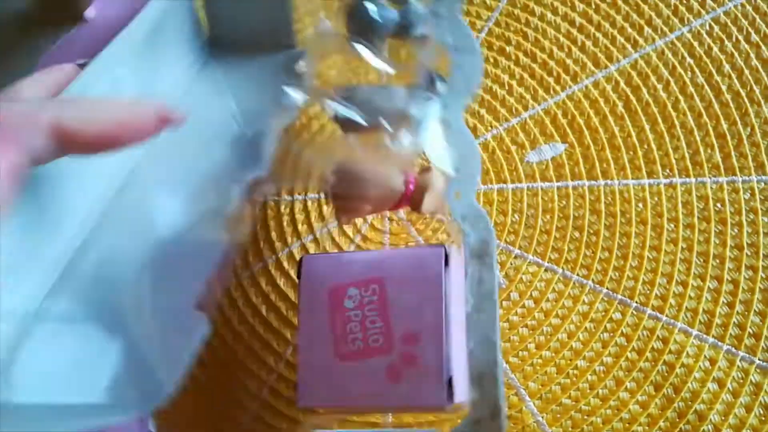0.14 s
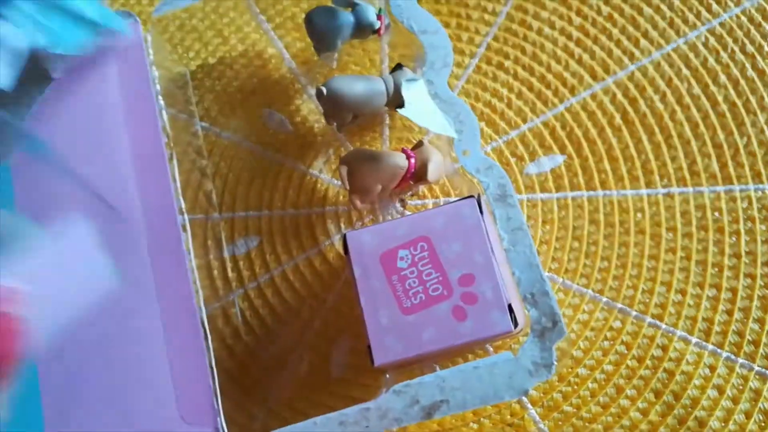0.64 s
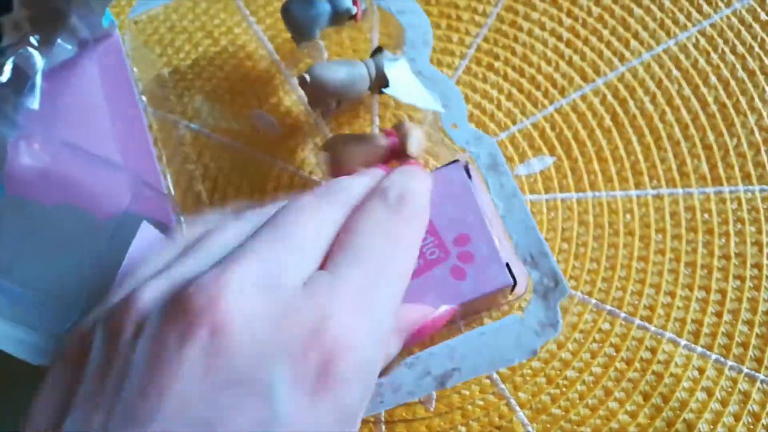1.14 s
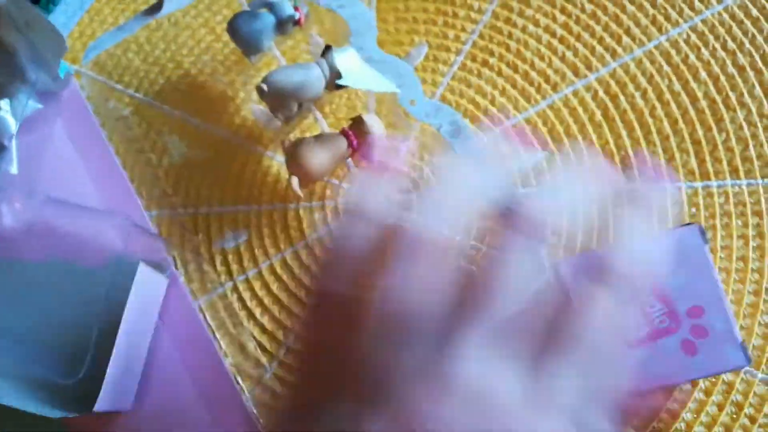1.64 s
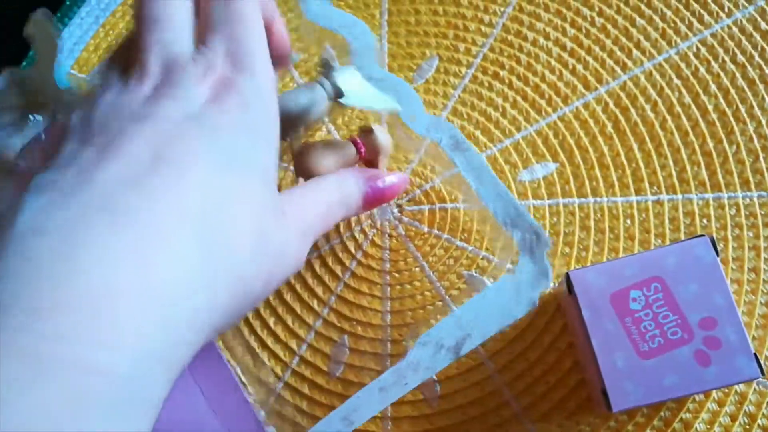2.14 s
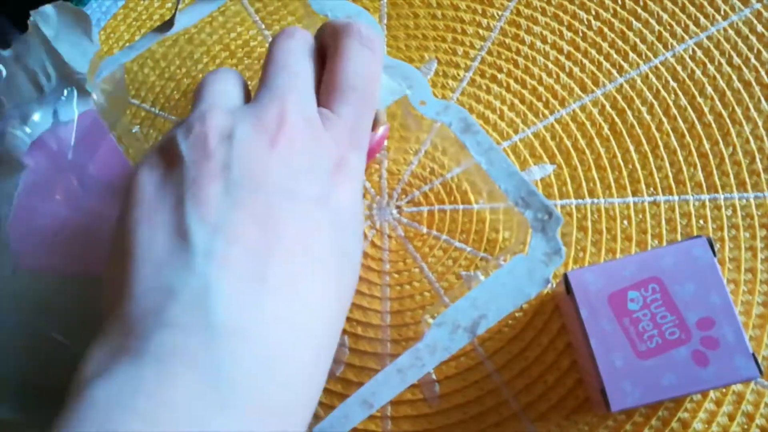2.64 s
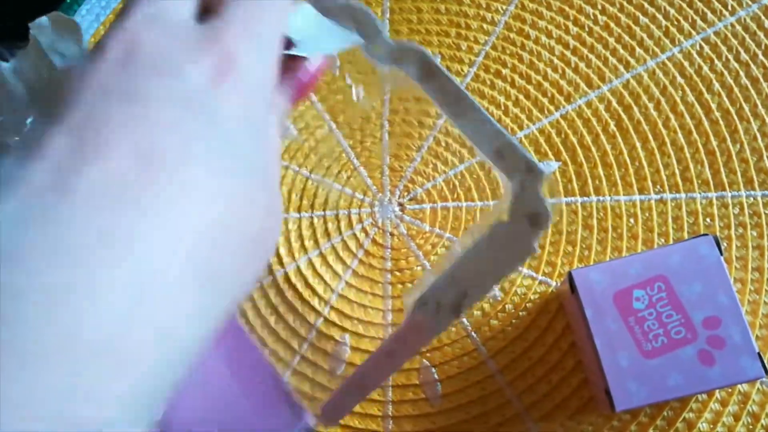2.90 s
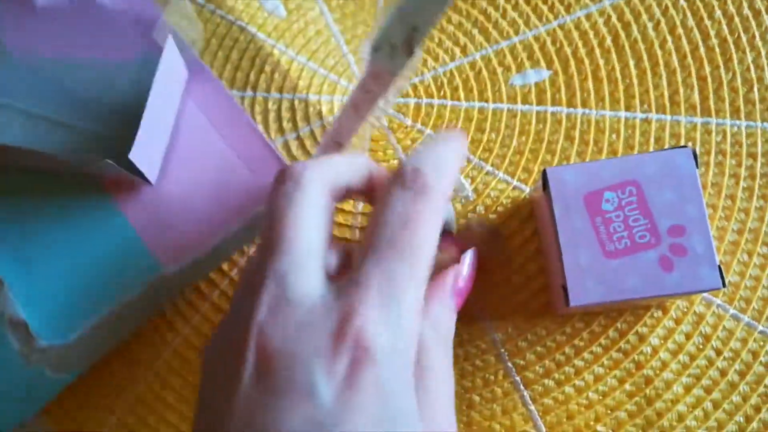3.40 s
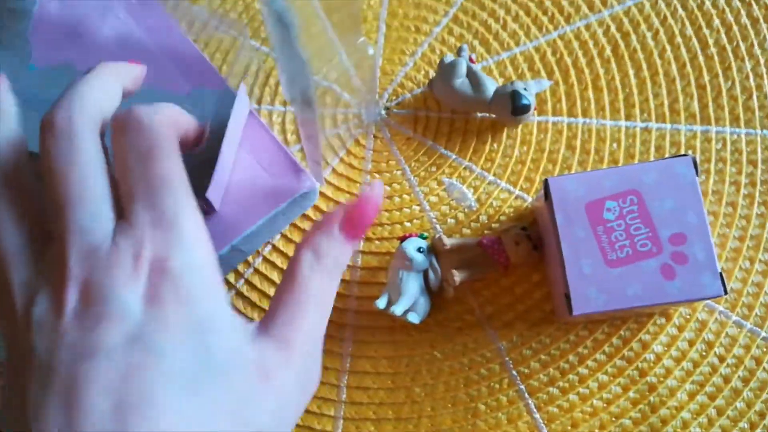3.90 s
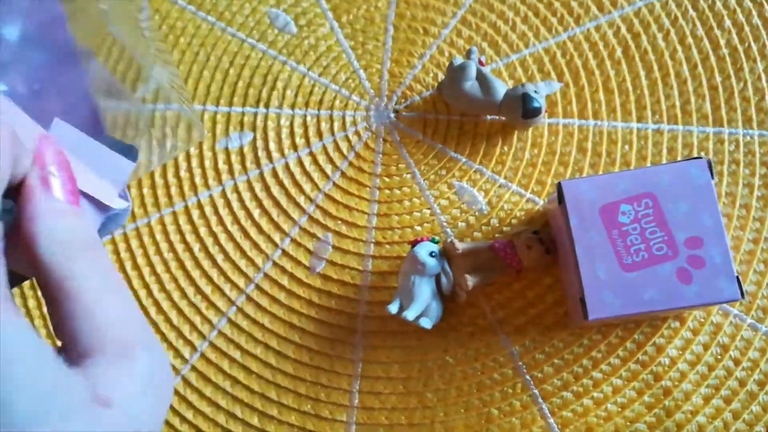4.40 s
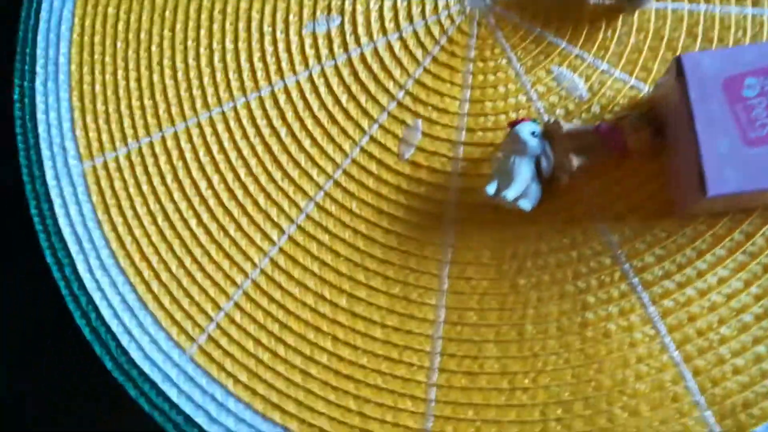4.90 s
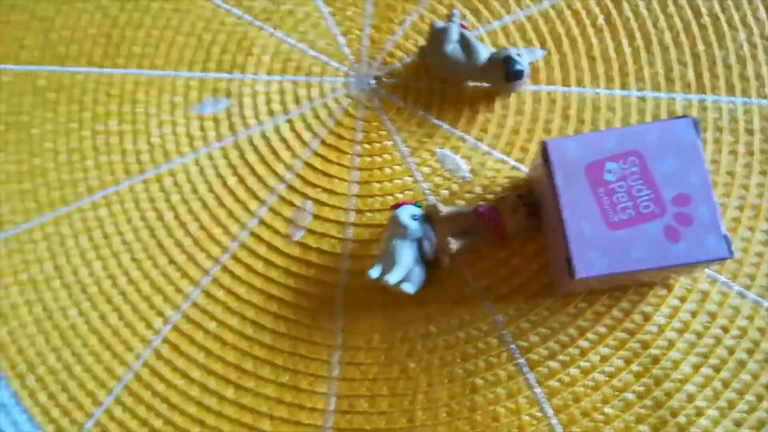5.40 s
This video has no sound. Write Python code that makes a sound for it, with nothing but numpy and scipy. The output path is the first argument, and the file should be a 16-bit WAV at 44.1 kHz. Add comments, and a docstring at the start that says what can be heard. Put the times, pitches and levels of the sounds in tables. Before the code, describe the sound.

Hands crinkle and tear a stiff clear blister pack over a table, busy bursts first, then isolated clicks, knocks and faint scrapes.

```python
"""Crisp plastic film crackles and thumps at once, close to a pair of microphones above a table: hands tear,
bend and crinkle a blister pack on cardboard. The film is noise under a dense rustle, sharp snaps that ring
and stick-slip creaks. Below it, noise and struck modes make the card and table scrape and thud.
Short reflections answer from the room, and behind them lie a quiet room tone and a faint hum."""
import sys
import numpy as np
from scipy import signal
from scipy.fft import rfft, irfft, next_fast_len
from scipy.io import wavfile
from scipy.ndimage import uniform_filter1d

SR = 44100
rng = np.random.default_rng(int(sys.argv[2]) if len(sys.argv) > 2 else 0)


def undo_db(level):
    """Turn decibels back into plain size, where 20 dB means ten times bigger."""
    steps = np.asarray(level, float) / 20
    return 10 ** steps


def pcm_store(signal):
    """Save signal as 16-bit PCM."""
    levels = np.round(np.clip(np.atleast_2d(signal), -1, 1) * 32767)
    wavfile.write(sys.argv[1], SR, levels.astype(np.int16).T)


N = 244314  # samples

# Hands crumple and tear the film. Each row: peak in seconds, rise in seconds, fall in seconds,
# rustle level in dB, treble in dB above the rustle.
CRUMPLES = [(0.0, .05, 0.04, -45, 2.5), (0.054, 0.024, 0.081, -39, -3), (.085, 0.04, 0.067, -35, -3),
            (.14, 0.052, 0.043, -39.5, -7.5), (.24, 0.1, 0.028, -60.5, 6), (.272, 0.022, 0.021, -45.5, 5.5),
            (.335, .025, 0.05, -53, 2.5), (.369, 0.068, 0.043, -45, -11), (.396, 0.024, 0.016, -33, -3),
            (.453, .06, 0.021, -50, -10.5), (0.549, 0.013, 0.045, -47, 6.5), (.695, 0.034, 0.12, -58, -3),
            (.757, 0.044, 0.032, -44.5, -3), (.954, 0.043, 0.056, -61, 0), (1.12, 0.42, 0.036, -65, -7),
            (1.159, 0.022, 0.15, -44, -12.5), (1.291, 0.049, 0.052, -44, -1), (1.34, .05, 0.038, -54, -5),
            (1.598, .008, 0.045, -55, -3), (1.85, 0.034, .08, -57.5, -1), (1.889, .03, 0.022, -50, -6),
            (1.939, 0.022, 0.042, -48.5, -8), (1.99, 0.016, .04, -45.5, -9),
            (2.011, 0.032, 0.035, -37.5, -13), (2.139, 0.036, .08, -60, -2),
            (2.171, 0.011, 0.053, -38, -5.5), (2.26, 0.16, .1, -60, -3), (2.317, 0.028, 0.081, -46, -15),
            (2.355, 0.045, 0.06, -51, -2.5), (2.448, 0.013, 0.026, -45, -15),
            (2.561, 0.0078, 0.074, -46.5, -4), (2.588, 0.035, 0.043, -37, -16),
            (2.625, 0.048, 0.1, -51, -4.5), (2.997, 0.034, 0.024, -56, 12.5), (3.316, 0.08, 0.13, -72, -10),
            (3.465, .1, 0.1, -60, -4), (3.755, 0.011, 0.17, -53.5, -7), (3.828, 0.066, 0.034, -55, 4),
            (3.882, 0.022, 0.045, -62.5, 9), (4.122, 0.081, 0.05, -49.5, 6.5), (4.2, 0.17, 0.12, -55.5, 5),
            (4.282, 0.03, 0.054, -50.5, -5), (4.377, 0.12, .15, -69, -14),
            (4.617, 0.071, 0.043, -48.5, 4.5), (4.632, 0.039, 0.078, -51.5, -3),
            (5.117, .022, 0.041, -57.5, -5), (5.151, .02, 0.083, -41.5, 0.5),
            (5.251, 0.044, 0.031, -57.5, -0.5)]
# Faint rustle between the movements. Each row: time in seconds, level in dB.
FIDGET = [(0.0, -75), (.6, -76), (.9, -86), (1.5, -80.5), (1.82, -74.5), (2.75, -73.5), (2.92, -71.5),
          (3.05, -84), (4.0, -73.5), (5.54, -80.5)]
FIDGET_TREBLE_DB = -3  # relative to the faint rustle
# Buckling film. Each row: start in seconds, level in dB, time held before it settles in ms,
# ring in Hz, treble in dB above the level.
SNAPS = [(0.0205, -40.5, 2.8, 2240, -2), (0.032, -42, 1.1, 3120, 8), (0.038, -40, 1.1, 5100, -3.5),
         (0.0477, -36, 2.3, 7300, 8.5), (0.0714, -41, 11, 2180, 0), (0.0817, -25.5, 2.1, 2550, -10),
         (0.09, -29.5, 3.8, 1800, -9), (0.218, -50, 1, 8900, 9), (0.225, -47, 0.89, 10380, 13.5),
         (0.259, -45, 9.5, 4570, 10.5), (0.2861, -40.5, 1.6, 4520, 10), (0.3398, -31.5, 1, 9110, 11),
         (0.3437, -37.5, 5.3, 4400, -4), (0.3724, -23, 0.75, 2210, 0.5), (0.3865, -41.5, 5.7, 2030, 9.5),
         (0.4028, -20.5, 0.85, 3720, -4), (0.444, -38.5, 4.7, 4440, -9), (0.458, -35.5, 0.93, 3640, -4),
         (0.484, -43.5, 3.3, 3620, 7), (0.516, -53.5, 2, 9840, 19), (0.536, -53, 1.5, 9240, 19),
         (0.544, -43, 3.6, 8400, 20.5), (0.5592, -47, 1.5, 8800, 13), (0.677, -44.5, 1.8, 3800, -17),
         (0.693, -53, 5.5, 1590, -8), (0.7305, -40, 1.4, 4400, -3), (0.7555, -40.5, 4.3, 2430, 1.5),
         (0.7584, -34, 2.3, 3960, -11), (0.8, -52.5, 1.8, 8530, 4), (0.814, -57.5, 4.6, 4220, -12),
         (0.8856, -70, 2.2, 4670, 14), (1.0258, -48, 1.7, 2640, -10), (1.0423, -55, 1.6, 3470, 0),
         (1.07, -45, 1.5, 5600, -15), (1.1025, -49, 1.8, 1950, -4), (1.1462, -34.5, 2.7, 2400, -9),
         (1.169, -42.5, 2.6, 2510, -8), (1.1948, -49, 7.6, 2570, -8), (1.2113, -38, 6, 2610, -12),
         (1.2505, -28, 2.85, 1550, -8.5), (1.2575, -39.5, 5.4, 1730, -20), (1.2867, -37.5, 5.4, 3750, -1.5),
         (1.346, -52.5, 3.8, 2190, -9), (1.3644, -61, 5.5, 2180, -16), (1.586, -39.5, 2.4, 5070, -7),
         (1.643, -60.5, 1.6, 3770, 7), (1.8398, -40.5, 2.3, 4060, -3.5), (1.8834, -44, 2.4, 2300, -5),
         (1.8903, -44.5, 4.2, 2390, -5), (1.9364, -46.5, 4.5, 8800, -2), (1.9427, -42.5, 1.7, 6800, 8),
         (1.9872, -32, 1.74, 2450, -2), (2.007, -40, 1.5, 5100, 5), (2.0138, -31.5, 1, 4070, -3),
         (2.1121, -52, 1.4, 5140, 4), (2.1296, -45.5, 6.5, 3660, -13), (2.1633, -25.5, 3.7, 2020, -2.5),
         (2.1695, -37.5, 5, 5100, -1), (2.2347, -46, 1.6, 2170, -9), (2.246, -45, 1.9, 3530, 2.5),
         (2.2907, -53, 2.7, 4260, -8.5), (2.3101, -36.5, 2.5, 2260, -3.5), (2.329, -40, 4.3, 2430, -7),
         (2.3363, -44.5, 6.5, 5070, 4), (2.3478, -39.5, 2, 2110, 5), (2.359, -37.5, 1.5, 3600, -3),
         (2.3807, -39.5, 2.8, 2340, -8), (2.393, -44, 1.8, 1760, -1), (2.447, -48, 3.2, 5500, 7),
         (2.4862, -43, 1, 3650, -18), (2.5482, -41.5, 2.9, 3400, -4), (2.5592, -31, 1.2, 1470, -12),
         (2.578, -32.5, 1.6, 3750, 1.5), (2.583, -44, 3.2, 4800, 8.5), (2.6445, -25.5, 1.72, 2820, -15.5),
         (2.6855, -41, 1.2, 2440, -8), (2.7758, -55.5, 5.6, 2380, -3.5), (2.8064, -54.5, 3.2, 5260, -4),
         (2.858, -55.5, 3.8, 2070, -30), (2.916, -52, 1.1, 3290, -14), (2.9534, -62, 36, 2150, -19),
         (3.3, -69, 26, 2150, -20), (3.4231, -48.5, 3.3, 1360, -7.5), (3.534, -52, 2.1, 2140, 0.5),
         (3.743, -44, 3.5, 6700, 6), (3.8649, -58, 4.6, 2220, -6), (3.7823, -34.5, 2.5, 2480, -24),
         (3.819, -45.5, 1.4, 5340, 8), (4.0478, -51, 3.4, 5150, 11), (4.073, -43, 1.2, 5360, 5),
         (4.2701, -33.5, 2.85, 2100, -9.5), (4.3637, -59, 3.7, 2130, -1), (4.3828, -55, 1.8, 9580, 1),
         (4.6434, -30.5, 3.43, 2800, -2), (4.778, -64, 1.16, 10900, 14), (4.836, -64, 0.73, 9300, 17),
         (5.105, -55.5, 6.6, 3020, 1), (5.112, -56, 7.5, 3050, -14), (5.1363, -44, 9.1, 5000, 4),
         (5.1918, -42.5, 1.74, 8100, 7.5), (5.236, -52, 6.5, 2050, -17), (5.263, -66, 1.6, 3930, -4)]
# Small snaps come by chance, a little louder than the rustle around them.
TICKS = 45
TICK_DB, TICK_MS = 2, 1.74  # least level above the rustle; mean hold
TICK_LOW_HZ, TICK_HIGH_HZ = 1800, 5800
# Stick-slip of film on card. Each row: start in seconds, end in seconds, slips per second at the start,
# slips per second at the end, level in dB.
CREAKS = [(.11, .15, 1350, 1550, -45), (.15, .177, 1500, 1250, -43), (.317, .328, 1070, 1160, -39)]
# Spectrum that the stiff sheet radiates. Each row: frequency in Hz, level in dB.
FILM_SPECTRUM = [(410, -14.5), (700, -8), (994, -11.5), (1550, -1.5), (1830, -4), (2140, 1.5), (3040, -4),
                 (3740, -2), (7640, -10.5), (8470, -8), (10700, -12), (13300, -10), (15600, -16)]
SPLIT_HZ = 6000  # between the middle and the treble of the film
# Where the hands work. Each row: time in seconds, left over right in dB.
HAND_PLACE = [(0.0, 0), (1.29, -1), (1.46, -1), (4.51, .5), (4.69, 2.5), (4.91, -1.5), (5.54, -3)]

# Card dragged on a mat. Each row: peak in seconds, rise in seconds, fall in seconds,
# card level in dB, table level in dB.
DRAGS = [(.03, 0.16, 0.13, -70, -54.5), (.083, 0.059, 0.068, -47, -53), (.275, 0.076, 0.057, -59, -70),
         (.382, 0.033, 0.047, -44.5, -43), (.49, 0.023, 0.065, -67, -53), (.766, 0.037, 0.032, -52, -52),
         (.96, 0.06, 0.025, -61.5, -65), (1.17, 0.027, 0.14, -72, -63), (1.262, 0.15, .11, -60.5, -62.5),
         (1.594, .017, .04, -65, -59), (1.892, 0.078, 0.051, -67.5, -64.5), (2.014, 0.094, 0.051, -55, -74),
         (2.172, 0.053, 0.077, -52, -72), (2.253, 0.043, 0.073, -60, -65), (2.349, 0.085, 0.096, -53, -64),
         (2.455, 0.033, 0.075, -64, -67), (2.585, 0.055, .11, -52.5, -85),
         (2.985, 0.08, 0.05, -61.5, -62.5), (3.31, 0.027, .1, -71.5, -67),
         (3.432, 0.025, 0.052, -55.5, -54), (3.465, 0.048, 0.15, -60, -55.5), (3.54, .02, 0.072, -66, -55),
         (3.76, 0.016, 0.068, -59, -61), (3.79, 0.02, 0.057, -54, -61), (3.82, 0.036, 0.068, -55.5, -58),
         (3.88, 0.046, 0.045, -62, -57), (4.107, .055, .15, -58.5, -58), (4.376, 0.025, 0.046, -81, -55),
         (4.59, 0.19, 0.045, -71, -77), (4.648, 0.018, 0.049, -44, -77), (5.142, 0.019, .11, -49.5, -56.5)]
REST_CARD_DB, REST_TABLE_DB = -89, -78  # the pack never lies quite still
# Fingers and figures hit the card. Each row: start in seconds, level in dB, panel mode in Hz.
KNOCKS = [(0.036, -49, 485), (0.069, -24.5, 554), (0.268, -45.5, 383), (0.377, -32, 514), (0.445, -53, 605),
          (0.486, -47.5, 574), (0.697, -54, 580), (0.755, -39.5, 398), (0.95, -46, 493),
          (1.148, -48.5, 527), (1.181, -53.5, 557), (1.212, -46.5, 570), (1.252, -61, 540),
          (1.291, -46, 514), (1.588, -54, 547), (1.892, -60, 646), (1.935, -56, 414), (1.983, -50, 687),
          (2.009, -41, 560), (2.132, -44.5, 514), (2.163, -37, 338), (2.246, -48.5, 480), (2.333, -47, 405),
          (2.347, -42.5, 540), (2.449, -44.5, 455), (2.56, -46.5, 368), (2.585, -38, 449),
          (2.645, -46, 508), (2.686, -50, 550), (2.712, -56.5, 565), (2.839, -58, 550), (2.86, -49.5, 577),
          (2.956, -59.5, 244), (2.967, -54.5, 530), (2.991, -54.5, 516), (3.077, -58, 438),
          (3.402, -56, 540), (3.425, -44, 560), (3.458, -44, 564), (3.487, -57, 560), (3.51, -49, 550),
          (3.534, -45.5, 568), (3.578, -54.5, 567), (3.748, -55, 304), (3.781, -42, 680), (3.815, -48, 566),
          (3.872, -39.5, 586), (3.895, -53, 580), (4.049, -54, 577), (4.087, -49, 536), (4.112, -46, 320),
          (4.15, -63, 606), (4.269, -54, 590), (4.363, -53, 564), (4.639, -42, 253), (4.644, -31, 418),
          (4.684, -46, 483), (4.764, -58, 542), (5.137, -41, 796), (5.193, -62, 590)]
THUD_DB = -22.5  # part of each knock passes into the table
PANEL_DB, PANEL_T60_S = 1.5, 0.043  # the struck panel rings shortly
EDGE_MODE_HZ, EDGE_MODE_DB = 1105, -11  # a higher mode that every knock wakes
# Resonances of the card. Each row: frequency in Hz, width in Hz, level in dB.
CARD_MODES = [(550, 67, 3.5), (395, 330, -9.5), (664, 330, -5.5), (281, 140, -13.5), (887, 190, -23),
              (1235, 370, -7.5)]
# Resonances of the table. Each row: frequency in Hz, width in Hz, level in dB.
TABLE_MODES = [(139, 22, 5), (186, 130, -10), (71.5, 90, -3)]

STROKE_DB = 20  # a movement is this far under its peak one rise before it and one fall after it
CRUMPLE_ROUND, DRAG_ROUND = 1, 0.9  # 1 pointed, 2 round

# Shading by the microphone housing. Each row: frequency in Hz, left over right in dB.
HOUSING_LEAN = [(100, 0), (700, 0), (1400, 4.5), (2100, 5.5), (3000, 4), (4100, 0), (5200, 1.5),
                (6500, 3.5), (15000, 5.5)]
FILM_LAG_S, BASE_LAG_S = 0.0003104, 0.00025  # extra travel to the right microphone, from film and card
BASS_CUT_HZ = 64
ROOM_DB, ROOM_T60_S = -8.5, 0.083

# Colour of the room tone. Each row: frequency in Hz, level in dB.
HUSH_SPECTRUM = [(15, -42), (25, 2.5), (49, -1), (104, -13), (140, -40), (183, -4), (369, -5.5), (600, -4),
                 (948, -11), (3740, -17), (4400, -17.5), (9610, -17), (15600, -21.5)]
# Likeness of the room tone at the two microphones. Each row: frequency in Hz,
# left-right correlation (no unit, negative means opposed).
HUSH_SAME = [(60, 0.63), (150, 0.44), (380, 0.65), (950, -0.65), (2380, -0.051), (5980, -0.216),
             (15000, 0.16)]
HUSH_DB = -70
HUM_HZ, HUM_DB = 97, -78  # both waver around these means
EDGE_HZ = 15700  # top of the recorded band


def sheet():
    """The film: rustle of many creases, with snaps and creaks, radiated by one stiff sheet."""
    rustle = rustling()
    creases = grains(per_s=900, spread_db=5.2, decay_s=0.0026)
    middle, treble = rustle * (0.49 + 0.44 * creases)
    noise = pair(0.19)
    rings = snaps(middle, treble, creases, noise, ticks(rustle[0]))
    slips = creaks()
    radiated = film(middle * noise + slips, treble * noise + 0.6 * slips)
    pan_db = np.interp(np.arange(N) / SR, *np.transpose(HAND_PLACE))
    return (facets(radiated, patchy_db=2.5) + rings) * undo_db(np.outer([.5, -.5], pan_db))


def rustling():
    """Middle and treble envelopes: each crumple swells over the faint rustle of a held pack."""
    rest_db = np.interp(np.arange(N) / SR, *np.transpose(FIDGET))
    rows = [(*shape, db, db + high_db) for *shape, db, high_db in CRUMPLES]
    return strokes(rows, np.transpose([rest_db, rest_db + FIDGET_TREBLE_DB]), CRUMPLE_ROUND)


def snaps(middle, treble, creases, noise, small):
    """Film buckles suddenly: raises both drives in place and returns the rings of the facets."""
    rings, t = np.zeros((2, N)), np.arange(SR // 10) / SR
    for at, db, ms, hz, high_db in SNAPS + small:
        start = round(at * SR)
        span = slice(start, min(start + len(t), N))
        u = t[:span.stop - span.start]
        past = np.maximum(u - ms / 1000, 0)
        # long snaps are chains of creases
        running = 0.63 + 0.41 * creases[span] * np.clip(ms / 25.0, 0, 1)
        settling = np.exp(-past / 0.00048) + 0.16 * np.exp(-past / 0.0052)
        burst = undo_db(db) * (1 - np.exp(-u / 0.00068)) * running * settling
        middle[span] = np.hypot(middle[span], burst)
        treble[span] = np.hypot(treble[span], burst * undo_db(high_db))
        b, a = signal.iirpeak(hz, 6.5, SR)
        rings[:, span] += 3.6 * signal.lfilter(b, a, burst * noise[:, span])  # the buckled facet rings
    return rings


def ticks(rustle):
    """Small snaps at random moments, as rows like SNAPS; higher rings are brighter."""
    at, size, pitch = rng.random((TICKS, 3)).T
    hz = TICK_LOW_HZ * (TICK_HIGH_HZ / TICK_LOW_HZ) ** pitch
    db = 20 * np.log10(rustle[(at * N).astype(int)]) + TICK_DB + 5 * size
    return list(zip(at * N / SR, db, TICK_MS * (.5 + size), hz, -9 + 12 * pitch))


def creaks():
    """Film sticks and slips on card: an uneven pulse train, each slip shaking the film briefly."""
    slips = np.zeros(N)
    for start, end, first, last, db in CREAKS:
        span = slice(round(start * SR), round(end * SR))
        rate = np.linspace(first, last, num=span.stop - span.start)
        wobble = 1 + 0.45 * uniform_filter1d(rng.standard_normal(len(rate)), size=100)
        cycles = np.cumsum(rate * wobble) / SR
        slips[span] = undo_db(db) * evened(np.diff(np.floor(cycles), prepend=0))
    samples = np.arange(60)
    shudder = evened(rng.standard_normal(60) * np.exp(-samples / 20)) / np.sqrt(60)  # unit energy
    uneven = slips * undo_db(1.9 * rng.standard_normal(N))
    return np.convolve(uneven, shudder)[:N]


def film(middle, treble):
    """The stiff sheet radiates both drives, each through its part of one spectrum."""
    hz = np.linspace(0, SR / 2, num=4096)
    out = 0
    for drive, side in ((middle, 1), (treble, -1)):  # below the split, above the split
        gain = lambda f: undo_db(read(FILM_SPECTRUM, f)) / np.sqrt(1 + ((f + 1) / SPLIT_HZ) ** (8 * side))
        out = out + shaped(drive, gain) / np.sqrt(np.mean(gain(hz) ** 2))
    return out


def facets(x, patchy_db):
    """As the sheet bends, its resonances wander: random patches of louder and softer colour."""
    z = signal.stft(x, nperseg=256, noverlap=192)[2]
    patches = rng.standard_normal(z.shape[:0:-1]).T
    patches = uniform_filter1d(patches, size=4, axis=0)  # over frequency
    patches = evened(uniform_filter1d(patches, size=14, axis=1))  # over time
    gain_db = patchy_db * patches - .115 * patchy_db ** 2  # keeps the mean power
    return signal.istft(z * undo_db(gain_db), nperseg=256, noverlap=192)[1][:, :N]


def base():
    """Card and table: scraping and knocks drive noise through their resonances."""
    card, table = strokes(DRAGS, [REST_CARD_DB, REST_TABLE_DB], DRAG_ROUND)
    card = card * (.5 + 1.04 * grains(per_s=200, spread_db=0.5, decay_s=0.0032))
    table = table * (0.92 + 0.39 * grains(per_s=110, spread_db=4.6, decay_s=0.021))
    noise = pair(0.93)
    boxy = knocks(card, table)
    return modes(card * noise, CARD_MODES) + boxy + modes(table * pair(1.0), TABLE_MODES)


def knocks(card, table):
    """Blows on the card: raises both drives in place and returns the decaying tones of the panel."""
    boxy, t = np.zeros((2, N)), np.arange(SR // 10) / SR
    for at, db, hz in KNOCKS:
        span = slice(round(at * SR), round(at * SR) + len(t))
        blow = undo_db(db - 7.0) * (np.exp(-t / 0.0021) + 0.29 * np.exp(-t / 0.0095))
        card[span] = np.hypot(card[span], blow)
        table[span] = np.hypot(table[span], undo_db(db + THUD_DB) * np.exp(-t / 0.012))
        decay = undo_db(db + PANEL_DB - 60 * t / PANEL_T60_S) * (1 - np.exp(-t / 0.00061))
        edge = undo_db(EDGE_MODE_DB) * np.sin(2 * np.pi * EDGE_MODE_HZ * t)
        boxy[:, span] += decay * (np.sin(2 * np.pi * hz * t) + edge)
    return boxy


def strokes(table, rest_db, roundness):
    """Two envelopes: each movement swells to its peak and dies away; powers add over a resting level."""
    t = np.arange(N) / SR
    power = undo_db(np.array(rest_db) * np.ones((N, 1))).T ** 2
    for peak, rise, fall, *db in table:
        span = slice(max(round((peak - 2 * rise) * SR), 0), round((peak + 2 * fall) * SR))
        away = np.maximum((peak - t[span]) / rise, (t[span] - peak) / fall)
        power[:, span] += undo_db(np.array(db)[:, None] - STROKE_DB * away ** roundness) ** 2
    return np.sqrt(power)


def grains(per_s, spread_db, decay_s):
    """Envelope of tiny random creases or catches: sudden start, short decay, a few large."""
    size = undo_db(spread_db * np.minimum(rng.exponential(1, N), 4))
    starts = size * (rng.random(N) < per_s / SR)
    return evened(signal.lfilter([1], [1, -np.exp(-1 / (decay_s * SR))], starts))


def arriving(x, lag_s):
    """Earlier at the left microphone, shaded differently at each; small things radiate no deep bass."""
    side = np.array([[.5], [-.5]])

    def path(f):
        bass_cut = np.sqrt(1 + (BASS_CUT_HZ / (f + 1)) ** 6)
        return undo_db(side * read(HOUSING_LEAN, f)) / bass_cut * np.exp(2j * np.pi * f * side * lag_s)
    return shaped(x, path)


def room(x):
    """Short reflections: sparse taps of random sign, different at each microphone."""
    t = np.arange(SR // 4) / SR
    signs = rng.choice([-1., 1.], (2, len(t)))
    sparse = rng.random((2, len(t))) < .06
    taps = signs * sparse * undo_db(-60 * t / ROOM_T60_S) * (t > .003)
    return undo_db(ROOM_DB) * signal.oaconvolve(x, taps / np.linalg.norm(taps[0]), axes=1)[:, :N]


def hush():
    """Room tone: coloured noise, partly alike at the two microphones, and a wavering hum."""
    a, b = rng.standard_normal((2, N))
    same = lambda f: np.clip(read(HUSH_SAME, f), -1, 1)
    both = np.array([a, shaped(a, same) + shaped(b, lambda f: np.sqrt(1 - same(f) ** 2))])
    tone = evened(shaped(both, lambda f: undo_db(read(HUSH_SPECTRUM, f))))
    drift = evened(uniform_filter1d(rng.standard_normal((2, N)), size=4000))
    phase = 2 * np.pi * np.cumsum(HUM_HZ + 1.06 * drift[1]) / SR
    hum = undo_db(HUM_DB + 0.5 * drift[0]) * np.sin(phase) * np.sqrt(2)
    return undo_db(HUSH_DB) * tone + hum


def pair(same):
    """Noise at two microphones that share part of it."""
    a, b = rng.standard_normal((2, N))
    same = np.clip(same, 0, 1)
    return np.array([a, same * a + np.sqrt(1 - same ** 2) * b])


def modes(x, table):
    """Causal sum of resonances; white noise keeps its rms."""
    gain = lambda f: sum(undo_db(db) * 1j * w * f / (hz ** 2 - f ** 2 + 1j * w * f) for hz, w, db in table)
    return shaped(x, gain) / np.sqrt(np.mean(abs(gain(np.linspace(0, SR / 2, num=4096))) ** 2))


def shaped(x, gain):
    """Filters the last axis by a function of Hz."""
    size = next_fast_len(x.shape[-1])
    return irfft(rfft(x, size) * gain(np.fft.rfftfreq(size, 1 / SR)), size)[..., :x.shape[-1]]


def read(points, hz):
    """Reads a spectrum table on a log-frequency axis."""
    f, value = np.transpose(points)
    return np.interp(np.log(hz + 1), np.log(f + 1), value)


def evened(x):
    """Scales to rms 1."""
    return x / np.sqrt(np.mean(x ** 2) + 1e-20)


def scene():
    """The pack lies nearer the left microphone; the room answers it over the hush."""
    near = arriving(sheet(), FILM_LAG_S) + arriving(base(), BASE_LAG_S)
    return near + room(near) + hush()


def roll_off(x):
    """The treble ends steeply here."""
    return signal.sosfilt(signal.butter(12, 17000, fs=SR, output="sos"), x)


def record(dry):
    """The band ends in a steep slope: 24 dB down within 250 Hz."""
    limited = shaped(dry, lambda f: undo_db(-24 * np.clip((f - EDGE_HZ) / 250, 0, 1)))
    return roll_off(limited)


dry = scene()
out = record(dry)
pcm_store(out)
```